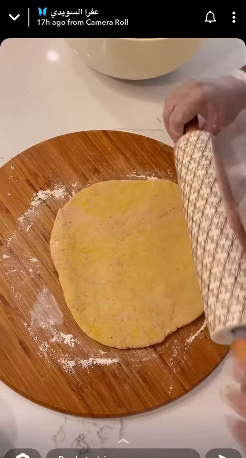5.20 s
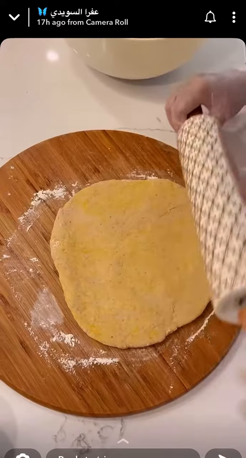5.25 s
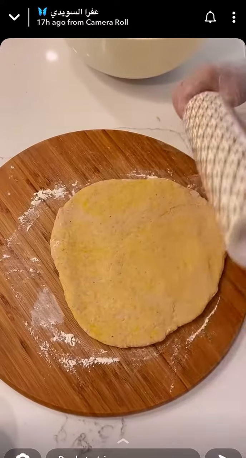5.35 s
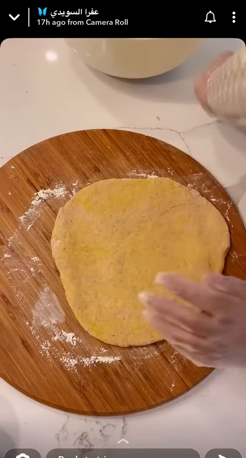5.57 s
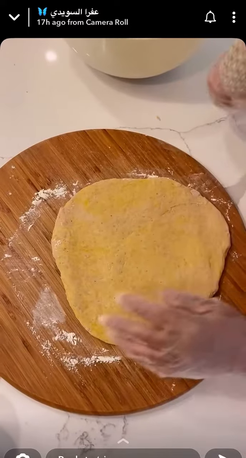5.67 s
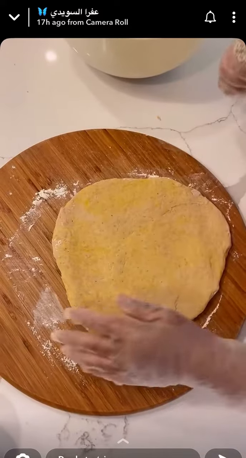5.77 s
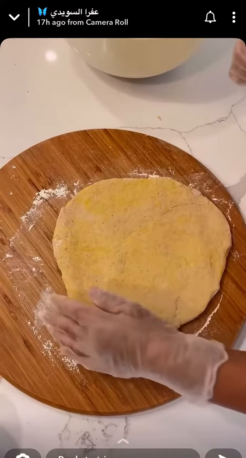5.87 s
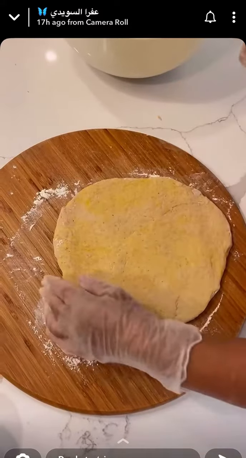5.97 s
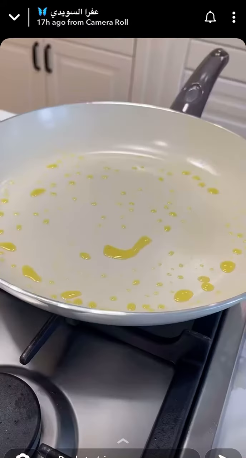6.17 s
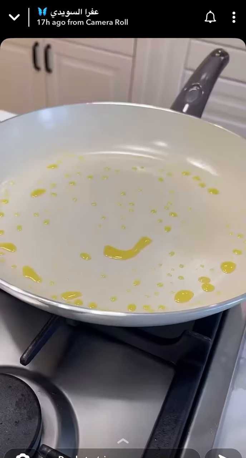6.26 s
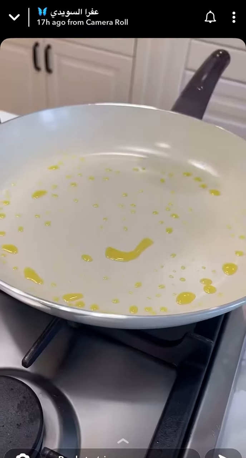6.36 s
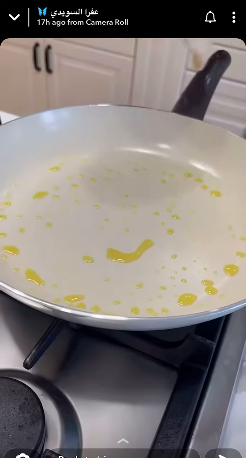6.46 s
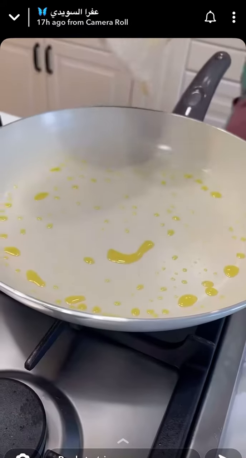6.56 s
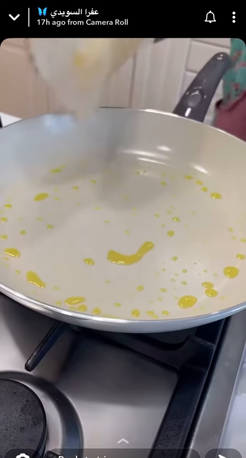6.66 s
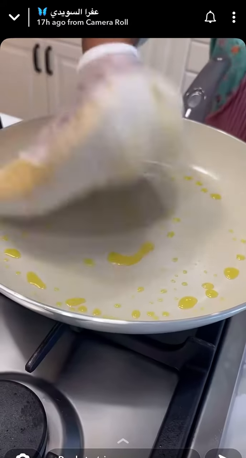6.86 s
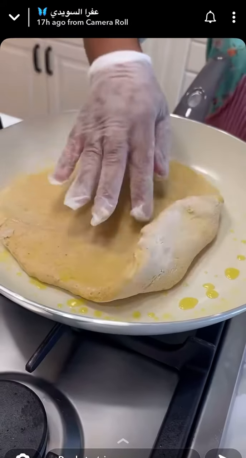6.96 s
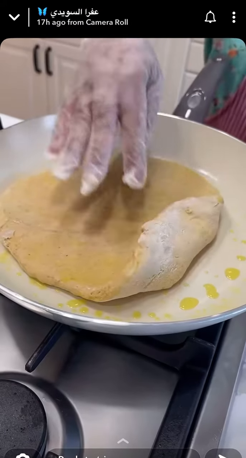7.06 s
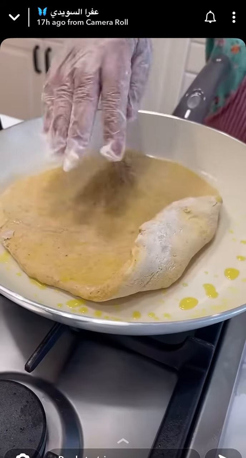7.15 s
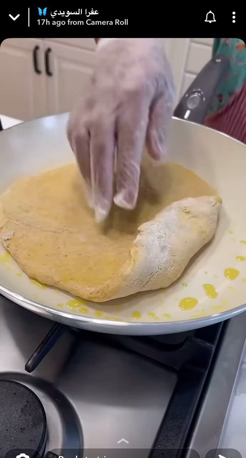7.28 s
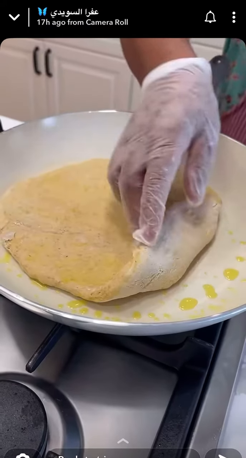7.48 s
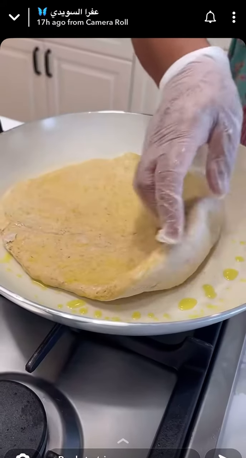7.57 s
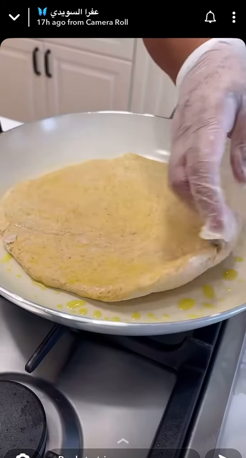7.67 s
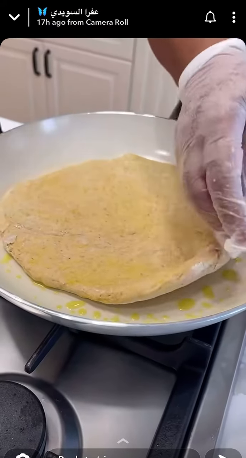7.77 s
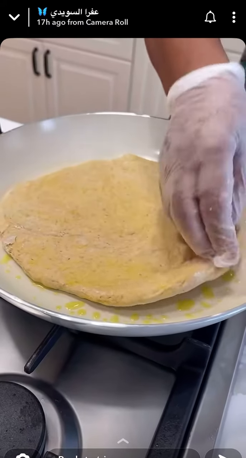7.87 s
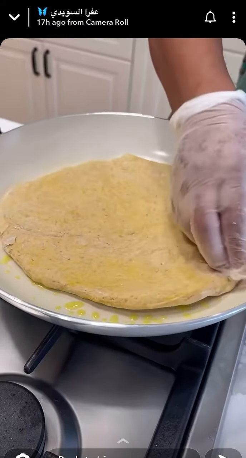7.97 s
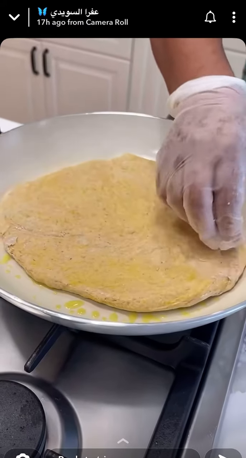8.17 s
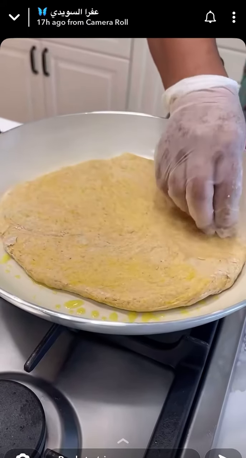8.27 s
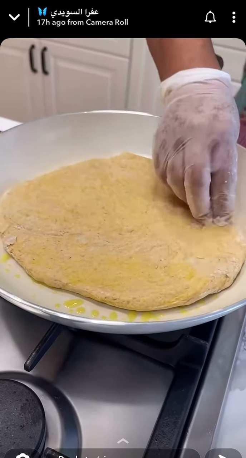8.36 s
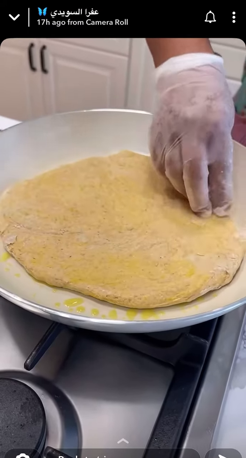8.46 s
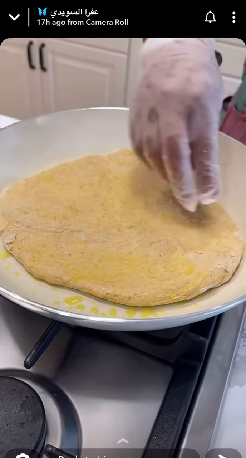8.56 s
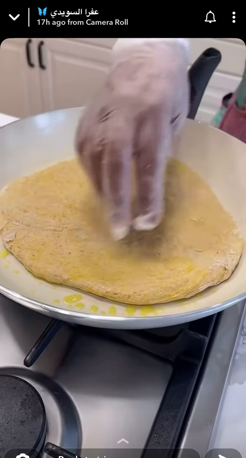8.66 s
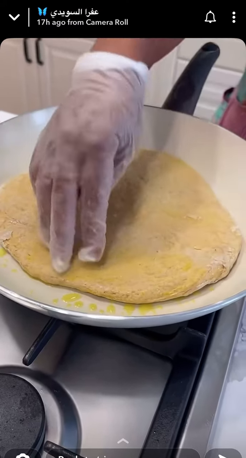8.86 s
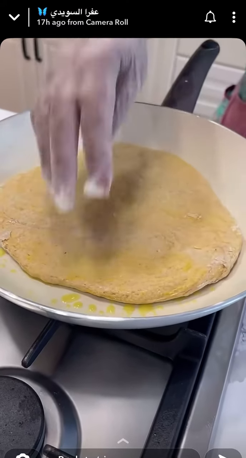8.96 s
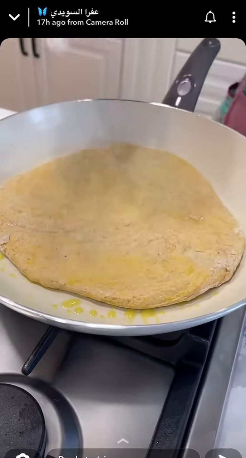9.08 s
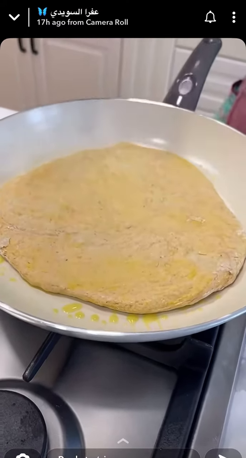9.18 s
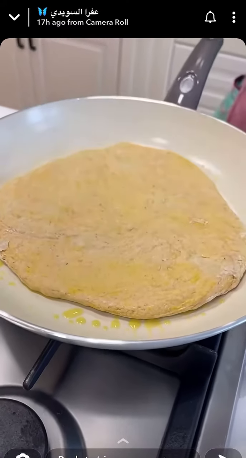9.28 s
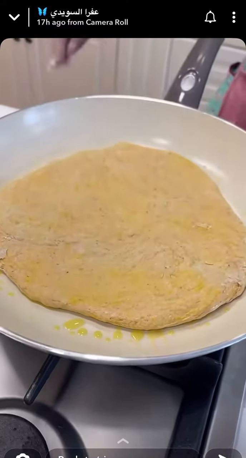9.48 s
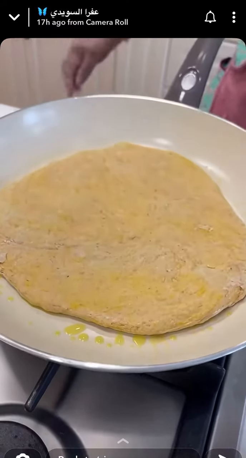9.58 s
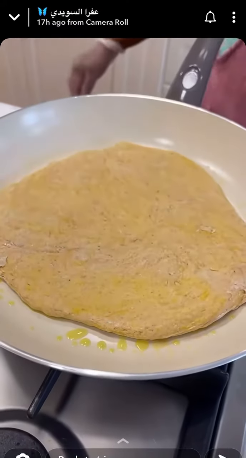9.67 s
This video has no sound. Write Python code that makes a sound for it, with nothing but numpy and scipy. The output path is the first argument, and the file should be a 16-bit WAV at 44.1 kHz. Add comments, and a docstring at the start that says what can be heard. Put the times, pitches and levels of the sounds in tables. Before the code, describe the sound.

Close kitchen sounds: irregular wooden clicks and soft glove rustle, a brief silent cut, then a dough slap and pan clatter on a humming stove.

```python
"""Kitchen, heard close up: gloved hands rustle (noise swelling in strokes) while a hard rolling pin clicks on a
wooden board (damped modes, crack noise, board knock), with dull taps and scuffs between clicks.
After a short silent cut, heard at the stove: dough slaps into a pan (noise bursts and short notes); the pan rings
and rocks on the grate (modes, ticks, boom), then rocks again. An extractor fan hums (shaft orders, mains lines, air
noise), at other levels at the board than at the stove. Hard walls answer each contact (decaying noise tail)."""
import sys
import numpy as np
from scipy import signal
from scipy.fft import rfft, irfft, next_fast_len
from scipy.io import wavfile
from scipy.ndimage import uniform_filter1d, map_coordinates

SR = 44100
rng = np.random.default_rng(int(sys.argv[2]) if len(sys.argv) > 2 else 0)


def store_wav(level_fs):
    """Save 16-bit WAV to argv[1]."""
    pcm = np.round(np.clip(np.atleast_2d(level_fs), -1, 1) * 32767)
    wavfile.write(sys.argv[1], SR, pcm.T.astype(np.int16))


N = 428652
SOUND_STOPS_S, SOUND_RETURNS_S, TREBLE_RETURNS_S = 6.039, 6.218, 6.56
BLOW_SCATTER_DB = 1.5  # spread of mode strengths from blow to blow


def amp(db):
    """dB to gain."""
    return 10 ** (np.asarray(db) / 20)


def unit(x):
    """Scale to rms 1."""
    return x / np.sqrt(np.mean(x ** 2) + 1e-20)


def along(points, hz):
    """Interpolate (hz, value) points on a log frequency axis."""
    point_hz, value = np.transpose(points)
    return np.interp(np.log(hz + 1), np.log(point_hz + 1), value)


def wobble(knots_per_s):
    """Smooth random curve through normally distributed knots."""
    knots = rng.standard_normal(int(N * knots_per_s / SR) + 4)
    return map_coordinates(knots, [np.arange(N) * knots_per_s / SR])


def filtered(x, response):
    """Multiply the spectrum by a response of frequency."""
    size = next_fast_len(len(x) + 8192)
    hz = np.fft.rfftfreq(size, 1 / SR)
    return irfft(rfft(x, size) * response(hz), size)[:len(x)]


def noise(spectrum, size=N):
    """Noise of rms 1, shaped by (hz, level_db) points."""
    white = rng.standard_normal(size)
    return unit(filtered(white, lambda hz: amp(along(spectrum, hz))))


def onset(t, rise_s):
    """Exponential rise towards full strength."""
    return 1 - np.exp(-t / rise_s)


def ring(modes, t, rise_s):
    """Sum of damped modes (hz, level_db, t60_s), each struck at a new random strength."""
    hz, level_db, t60_s = np.transpose(modes)[:, :, None]
    level_db = level_db + BLOW_SCATTER_DB * rng.standard_normal(level_db.shape)
    partials = amp(level_db - 60 * t / t60_s) * np.sin(2 * np.pi * hz * t)
    return np.sum(partials, axis=0) * onset(t, rise_s)


def add(track, start_s, sound):
    """Mix a sound in place, trimmed at the track end."""
    part = track[round(start_s * SR):][:len(sound)]
    part += sound[:len(part)]


# room decay: hz, t60_s
WALL_DECAY = [(500, 0.6), (2000, 0.69), (4000, 0.79), (8000, 0.54), (14000, 0.66)]


def walls(sound, wet_db):
    """Add a fresh diffuse tail: noise whose every frequency dies at its own speed."""
    white = rng.standard_normal(SR // 2 + SR // 4)
    hz, t, bins = signal.stft(white, SR, nperseg=256)
    decay = amp(-60 * t / along(WALL_DECAY, hz)[:, None])
    tail = signal.istft(bins * decay, SR, nperseg=256)[1]
    tail = amp(wet_db) * tail / np.linalg.norm(tail)
    response = np.pad(tail, (200, 0))  # delay, samples
    response[0] = 1  # direct path
    return signal.fftconvolve(sound, response)


def patchy(x, depth_db):
    """Random patches of gain in time and frequency, back at rms 1."""
    bins = signal.stft(x, nperseg=256)[2]
    field = uniform_filter1d(rng.standard_normal(bins.shape), 6, axis=0)
    field = uniform_filter1d(field, 12, axis=1)
    return unit(signal.istft(bins * amp(depth_db * unit(field)), nperseg=256)[1][:len(x)])


SHAFT_HZ = 22.335
# multiples of the shaft speed
SHAFT_ORDERS = (4, 5, 6, 7, 8, 9, 10, 11, 12, 13, 14, 15, 16, 17, 18, 22, 23, 25, 33, 35)
# level of each shaft order: board_db, stove_db
SHAFT_LEVELS = [(-53, -102), (-44.5, -40.5), (-48.5, -60.5), (-47, -70), (-64, -47.5), (-48.5, -48),
                (-54, -81), (-50, -60), (-56.5, -55.5), (-74, -61), (-60.5, -76), (-57.5, -68), (-62, -59),
                (-53.5, -82), (-61, -57.5), (-65.5, -92), (-68.5, -61.5), (-60.5, -74), (-62.5, -79),
                (-59.5, -57)]
# mains hum: hz, board_db, stove_db
MAINS_HUM = [(47.6, -54.5, -48), (97.6, -65, -52), (251.5, -61, -53)]
# moving air spectrum at the board: hz, relative_db_per_hz
BOARD_AIR = [(18, -47.5), (30, -15), (59, -15.5), (99, -4), (135, -4.5), (231, -1), (286, -8), (389, -6.5),
             (445, -10), (764, -10), (857, -15.5), (2080, -25.5), (3000, -37.5), (3900, -67), (6600, -120)]
# moving air spectrum at the stove: hz, relative_db_per_hz
STOVE_AIR = [(18, -42), (30, -5), (60, -6.5), (92, -6.5), (118, -1.5), (151, -4.5), (270, -5), (445, -15),
             (583, -14.5), (779, -14.5), (908, -19), (2080, -27), (3000, -39), (3900, -70), (6600, -120)]
BOARD_AIR_DB, STOVE_AIR_DB = -40.5, -39.5


def fan():
    """Wavering shaft orders and mains lines over air noise; stove levels apply after the cut."""
    t = np.arange(N) / SR
    at_stove = t > SOUND_RETURNS_S
    shaft_phase = 2 * np.pi * SHAFT_HZ * t + 0.049 * wobble(1)
    lines = [(order * shaft_phase, *levels) for order, levels in zip(SHAFT_ORDERS, SHAFT_LEVELS)]
    lines += [(2 * np.pi * hz * t, *levels) for hz, *levels in MAINS_HUM]
    hum = np.zeros(N)
    for phase, board_db, stove_db in lines:
        level_db = np.where(at_stove, stove_db, board_db) + 0.68 * wobble(2.066)
        hum += np.sqrt(2) * amp(level_db) * np.sin(phase + rng.uniform(0, 2 * np.pi))
    stove_air = amp(STOVE_AIR_DB) * noise(STOVE_AIR)
    board_air = amp(BOARD_AIR_DB) * noise(BOARD_AIR)
    air = np.where(at_stove, stove_air, board_air)
    return hum + air * amp(0.94 * wobble(8))


# cloth-like spectrum: hz, relative_db
SOFT_RUB = [(1500, -68.5), (2600, -6.5), (3800, -5), (5500, -5.5), (8000, -5.5), (11000, -11.5),
            (16500, -18.5)]
# crisp film spectrum: hz, relative_db
CRISP_FILM = [(6000, -53.5), (9000, -7), (12000, -9), (15000, 13.5), (16500, 12)]
# gloved hands over dough and flour: full_strength_s, held_s, soft_db, crisp_db
HAND_STROKES = [(.11, 0.066, -64, -77.5), (.275, 0.026, -54.5, -63.5), (.48, .03, -59, -67),
                (.65, 0.027, -56.5, -65.5), (.825, .015, -46.5, -59), (.965, 0.016, -49.5, -53.5),
                (1.05, 0.024, -47.5, -52), (1.38, 0.31, -50.5, -65), (1.93, .09, -48, -57.5),
                (2.09, 0.076, -55, -70), (2.44, 0.2, -59, -72), (2.8, 0.024, -58, -63),
                (2.9, .24, -54, -62), (3.29, 0.044, -59, -67.5), (3.37, .01, -52.5, -62),
                (3.5, .14, -57, -70), (3.69, 0.18, -52, -63.5), (3.985, .01, -51.5, -62),
                (4.17, 0.035, -56, -71.5), (4.37, .03, -48.5, -65), (4.66, 0.018, -50.5, -54.5),
                (4.89, 0.046, -52.5, -59), (5.015, 0.012, -54, -65), (5.15, 0.11, -58, -58.5),
                (5.645, .03, -57.5, -78.5), (5.85, 0.087, -49, -57), (5.98, 0.025, -44.5, -56.5),
                (6.63, 0.045, -55.5, -68.5), (6.8, 0.18, -56, -65.5), (7.2, 0.055, -60, -57),
                (7.38, 0.087, -55.5, -71), (7.565, 0.046, -50.5, -51), (7.745, 0.13, -53.5, -60),
                (7.93, 0.12, -61, -71), (8.155, .005, -59.5, -70), (8.205, 0.022, -52.5, -58),
                (8.325, .015, -61, -60.5), (8.41, 0.034, -57.5, -66), (8.505, .02, -63, -62.5),
                (8.705, 0.018, -59, -75.5), (9.06, .03, -57, -70), (9.26, 0.2, -59.5, -71),
                (9.53, .02, -58.5, -68), (9.63, .1, -62, -79)]
# single glove snaps: start_s, level_db
GLOVE_SNAPS = [(5.999, -48.5), (7.5788, -27.5), (8.2144, -48.5)]
SOFT_SWELL_DB_PER_S, SOFT_FADE_DB_PER_S = 150.5, 160
CRISP_SWELL_DB_PER_S, CRISP_FADE_DB_PER_S = 189.5, 210.5
SOFT_RESTING_DB, CRISP_RESTING_DB = -74.5, -80  # hands never quite still


def rustle():
    """Gloves rub dough: soft and crisp noise in grainy strokes, plus a few short snaps."""
    t = np.arange(N) / SR
    soft_power = np.full(N, amp(SOFT_RESTING_DB) ** 2)
    crisp_power = np.full(N, amp(CRISP_RESTING_DB) ** 2)
    for full_s, held_s, soft_db, crisp_db in HAND_STROKES:
        early_s = np.maximum(full_s - t, 0)
        late_s = np.maximum(t - full_s - held_s, 0)
        soft_power += amp(soft_db - SOFT_SWELL_DB_PER_S * early_s - SOFT_FADE_DB_PER_S * late_s) ** 2
        crisp_power += amp(crisp_db - CRISP_SWELL_DB_PER_S * early_s - CRISP_FADE_DB_PER_S * late_s) ** 2
    grains = unit(amp(0.59 * wobble(270) + 2.0 * wobble(40)))
    soft = np.sqrt(soft_power) * patchy(noise(SOFT_RUB), depth_db=2.0)
    crisp = np.sqrt(crisp_power) * patchy(noise(CRISP_FILM), depth_db=4.5)
    out = grains * (soft + crisp)
    t = np.arange(600) / SR
    for start_s, level_db in GLOVE_SNAPS:
        snap = noise([(3000, -13.5), (8000, 9), (16000, -1.5)], size=len(t))
        add(out, start_s, amp(level_db - 60 * t / 0.012) * snap)
    return out


# dull taps on wood: start_s, level_db, pitch_hz, t60_s
WOOD_TAPS = [(0.127, -23.5, 1180, 0.02), (0.4602, -30, 1570, 0.011), (1.585, -36.5, 1880, 0.08)]
# pin sliding over the board: start_s, length_s, board_db, pin_db
SLIDES = [(0.971, 0.03, -48.5, -55), (0.999, 0.047, -49, -62), (3.816, 0.047, -51.5, -56.5),
          (3.869, 0.043, -54, -64), (3.906, 0.027, -52.5, -57), (4.268, 0.031, -75, -63),
          (5.006, 0.04, -58, -55.5), (5.641, 0.022, -62, -62)]
# board modes, also knocked by pin(): hz, level_db, t60_s
BOARD_MODES = [(1259, -7, 0.029), (1534, 6, 0.015), (1826, -5, 0.03), (1987, 1, 0.021), (2264, 1.5, 0.025),
               (2510, -5.5, 0.048), (2920, -9.5, 0.017)]
# pin modes before damping by the grip, also rung by pin(): hz, level_db, t60_s
PIN_MODES = [(3836, 4, 0.056), (3830, -15.5, 0.3), (3996, -3, 0.057), (4410, -10, 0.034),
             (4730, -13.5, 0.019), (5263, 5, 0.037), (5480, -9.5, 0.056), (6074, 4.5, 0.028),
             (6280, 1.5, 0.032), (6440, -4.5, 0.038), (7280, -19, 0.017), (7190, -3, 0.021),
             (7660, -7.5, 0.023), (7950, -10, 0.025), (8320, 0.5, 0.048), (9900, -16, 0.022),
             (10230, -12.5, 0.02), (11300, -23, 0.025), (12900, -15, .022)]


def scuffs():
    """Dull two-mode taps, and slides whose many tiny contacts excite board and pin together."""
    out, t = np.zeros(N), np.arange(SR // 10) / SR
    for start_s, level_db, pitch_hz, t60_s in WOOD_TAPS:
        tap = ring([(pitch_hz, 0, t60_s), (pitch_hz * 1.4, -10, t60_s / 2)], t, rise_s=0.00036)
        add(out, start_s, amp(level_db) * walls(tap, wet_db=-5))
    # contact damps the sliding pin
    damped_pin = [(hz, db - 6 * (hz > 4500), min(t60_s, 0.025)) for hz, db, t60_s in PIN_MODES]
    for start_s, length_s, board_db, pin_db in SLIDES:
        n = round(length_s * SR)
        contacts = rng.standard_normal(n) * amp(9.2 * rng.standard_normal(n))
        contacts *= signal.windows.tukey(n, 0.3)
        board = unit(signal.fftconvolve(contacts, ring(BOARD_MODES, t, rise_s=0.0014)))
        body = unit(signal.fftconvolve(contacts, ring(damped_pin, t, rise_s=0.0014)))
        add(out, start_s, walls(amp(board_db) * board + amp(pin_db) * body, wet_db=-10.0))
    return out


# pin contacts: start_s, level_db, second_mode_db, third_mode_db, upper_modes_db, board_knock_db,
# grip_damping_factor, room_db (all but level_db relative)
PIN_CLICKS = [(1.248, -56, 14.5, -9, -6, 3, 1.3, -5), (1.5024, -45.5, 15, -4, -9, 8.5, 1.3, -9.5),
              (1.6468, -12, -0.5, -2.5, 1, -7.5, 1.38, -3),
              (2.0948, -30.5, 17.5, -5, -10.5, 4.5, 1.8, -13.5), (2.4209, -43.5, 12, -11, -1, 14, 2.1, -5),
              (2.9061, -13.5, -11.5, -12.5, -12.5, -11.5, 0.81, -8.5),
              (3.0579, -9.5, -8, -2.5, -4, -9.5, 1.54, -6), (3.3074, -32, 19, -13, -7.5, 6.5, 3.4, -9),
              (3.3726, -41.5, 1, -18, -14, 6, 1.4, -4), (3.5249, -7.5, 5, -5.5, -4, -11, 1.7, -8.5),
              (3.9862, -49, 2.5, -13, -13, 7, 1.2, -5), (4.308, -18.5, -5, -10.5, -9.5, 1, 0.87, -7),
              (4.4866, -25.5, -2, -6.5, 1, -4.5, 1.2, -7), (5.669, -35.5, 3, -21, -19, -3, 2.5, -13)]
# contact crack spectrum: hz, relative_db
CRACK_SPECTRUM = [(700, -50), (1300, -2.5), (2500, -2), (5500, -3.5), (8500, -5.5), (11000, -27),
                  (16500, -28.5)]
DULLING_DB_PER_DB = 0.2  # highest modes' loss per dB that a blow is weaker
CRACK_DB, CRACK_KNOCK_SHARE = 1, 0.1  # crack offset; share of the knock's dB added to it


def pin():
    """Each contact rings the gripped pin, cracks and knocks the board; then the walls answer."""
    out, t = np.zeros(N), np.arange(SR // 2) / SR
    hz, mode_db, t60_s = np.transpose(PIN_MODES)
    hardest_db = max(row[1] for row in PIN_CLICKS)
    for start_s, level_db, second_db, third_db, upper_db, knock_db, grip, room_db in PIN_CLICKS:
        top_db = upper_db - DULLING_DB_PER_DB * (hardest_db - level_db)
        # mode balance set by the contact point
        struck_db = np.interp(hz, (3850, 4000, 5250, 6200, 8300), (0, second_db, third_db, upper_db, top_db))
        body = ring(np.transpose([hz, mode_db + struck_db, t60_s / grip]), t, rise_s=0.0011)
        # the crack's top follows half of top_db
        spectrum = [(f_hz, db + 0.5 * top_db * (f_hz > 7000)) for f_hz, db in CRACK_SPECTRUM]
        crack_db = CRACK_DB + CRACK_KNOCK_SHARE * knock_db
        crack = amp(crack_db - 60 * t / 0.018) * onset(t, 0.00044) * noise(spectrum, size=len(t))
        knock = amp(knock_db) * ring(BOARD_MODES, t, rise_s=0.0019)
        add(out, start_s, amp(level_db) * walls(body + crack + knock, wet_db=room_db))
    return out


# dough landing: start_s, slap_db, hollow_note_db, pitch_hz
DOUGH_SLAPS = [(6.8215, -21.5, -32, 2500), (6.826, -15.5, -25, 1640), (6.851, -22.5, -20, 2180),
               (6.863, -25.5, -24.5, 688), (6.868, -25, -32, 1000), (6.902, -24, -17, 2330)]
# slap spectrum: hz, relative_db
SLAP_SPECTRUM = [(300, -16), (600, 7.5), (1600, 2), (2400, 1), (5000, -4.5), (10000, -10), (16500, -18.5)]
# pan bouncing on the grate: start_s, pan_ring_db, tick_db, stove_thud_db, grate_knock_db
PAN_BOUNCES = [(6.905, -22, -22.5, -23, -9.5), (6.953, -27.5, -33, -25.5, -19),
               (7.028, -37, -46, -28.5, -40), (8.7589, -31, -27.5, -26.5, -13.5),
               (8.809, -27.5, -29.5, -22.5, -36), (8.876, -36, -38.5, -33, -23),
               (8.924, -42, -48.5, -34, -38), (8.959, -46, -50, -32.5, -46)]
# pan modes: hz, level_db, t60_s
PAN_MODES = [(454, -25, 0.11), (595, -6, 0.092), (732, 3.5, 0.059), (826, 2, 0.18), (882, -6, 0.45),
             (996, -10.5, 0.31), (1086, 6.5, 0.067), (1208, -7, 0.12), (1330, -7.5, 0.12),
             (1550, -18, 0.089), (2420, -17, 0.051), (4300, -17.5, .12)]
# grate modes: hz, level_db, t60_s
GRATE_MODES = [(594, 0, 0.0088), (884, 4.5, 0.017), (1143, -2, 0.03), (1393, -19, 0.015),
               (1626, -23, 0.0069), (2390, -13, 0.02)]
# metal on metal spectrum: hz, relative_db
TICK_SPECTRUM = [(600, -13), (1500, 10), (2400, 0), (4400, -4), (8000, -11), (16500, -45)]
# stove top modes: hz, level_db, t60_s
STOVE_MODES = [(45, -19, 0.25), (67.9, -3.5, 1), (122.9, 0.5, 0.49), (188.4, 2, 0.19), (268, -15, 0.11),
               (438.7, -13, 0.38)]
# dense low modes of the stove, as noise: hz, relative_db
RUMBLE_SPECTRUM = [(40, -20), (100, 5.5), (300, -2), (800, -10.5), (1400, -21.5), (3000, -55)]


def pan():
    """Dough slaps the pan, which rings and bounces on the grate; the stove top booms."""
    out, t = np.zeros(N), np.arange(SR) / SR
    for start_s, slap_db, note_db, pitch_hz in DOUGH_SLAPS:
        slap = amp(slap_db - 60 * t / 0.023) * onset(t, 0.00078) * noise(SLAP_SPECTRUM, size=len(t))
        note = ring([(pitch_hz, note_db, 0.022)], t, rise_s=0.00064)
        add(out, start_s, walls(slap + note, wet_db=-8))
    for start_s, ring_db, tick_db, thud_db, knock_db in PAN_BOUNCES:
        metal = amp(ring_db) * ring(PAN_MODES, t, rise_s=0.00097)
        knock = amp(knock_db) * ring(GRATE_MODES, t, rise_s=0.0019)
        tick = amp(tick_db - 60 * t / 0.024) * noise(TICK_SPECTRUM, size=len(t))
        boom = ring(STOVE_MODES, t, rise_s=0.0015)
        rumble = amp(-2.0 - 60 * t / 0.47) * onset(t, 0.0026) * noise(RUMBLE_SPECTRUM, size=len(t))
        add(out, start_s, walls(metal + tick + knock, wet_db=-8.0))
        add(out, start_s, amp(thud_db) * (boom + rumble))
    return out


def scene():
    """All sources, one channel."""
    return (fan() + rustle() + scuffs() + pin() + pan())[None]


# microphone hiss spectrum: hz, relative_db_per_hz
HISS_SPECTRUM = [(1470, -17.5), (2500, -5.5), (4990, -13.5), (5520, -13), (6350, -14), (7950, -16.5),
                 (10900, -30), (16000, -38.5)]
HISS_DB = -59
BASS_CUT_HZ = 38
DIP_HZ, DIP_WIDTH_HZ, DIP_DB = 2860, 420, -4  # dull region of the microphone port
PEAK_SWING = 0.9  # limit of the microphone stage
DULL_HZ, TOP_HZ = 8700, 15900  # upper limits: while dull, always


def record(dry):
    """Microphone with hiss, dip and soft saturation; sound stops at the cut, returns dull, regains treble."""
    t = np.arange(N) / SR
    mic = filtered(dry[0], lambda hz: hz ** 4 / (hz ** 4 + BASS_CUT_HZ ** 4))
    mic = mic + amp(HISS_DB) * noise(HISS_SPECTRUM)
    mic = filtered(mic, lambda hz: amp(DIP_DB * np.exp(-((hz - DIP_HZ) / DIP_WIDTH_HZ) ** 2)))
    mic = mic / (1 + np.abs(mic / PEAK_SWING) ** 4) ** 0.25
    treble = filtered(mic, lambda hz: hz > DULL_HZ)
    # treble fades back in over 60 ms
    dull = (t > SOUND_RETURNS_S) * np.clip((TREBLE_RETURNS_S + 0.045 - t) / 0.06, 0, 1)
    sounding = (t < SOUND_STOPS_S) | (t > SOUND_RETURNS_S)
    heard = (mic - dull * treble) * sounding
    return filtered(heard, lambda hz: hz < TOP_HZ)[None]


dry = scene()
out = record(dry)
store_wav(out)
```